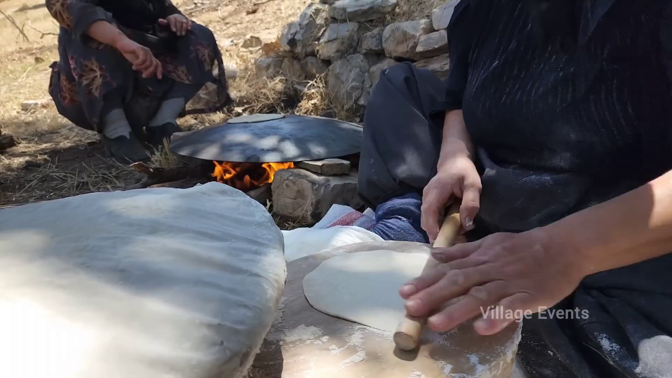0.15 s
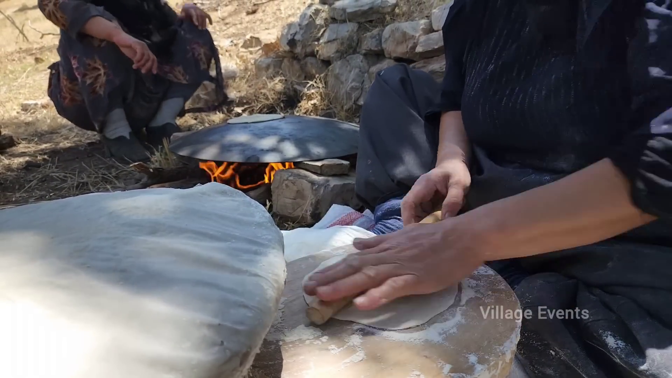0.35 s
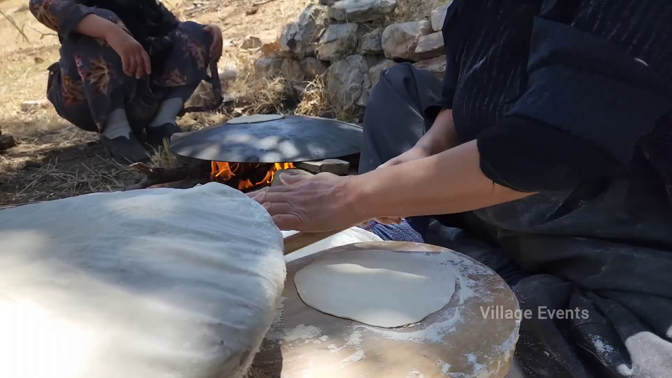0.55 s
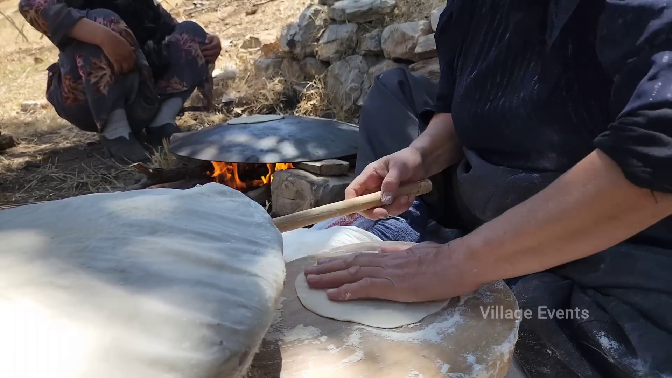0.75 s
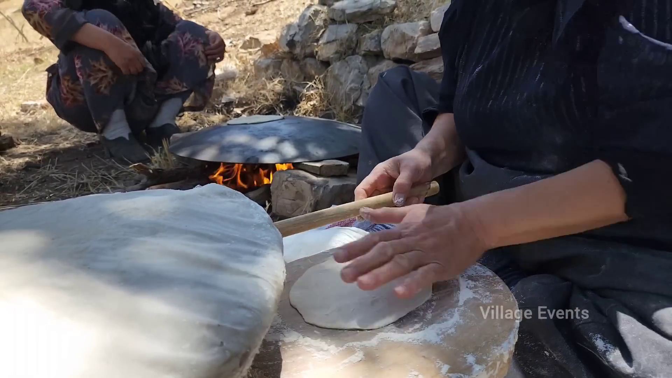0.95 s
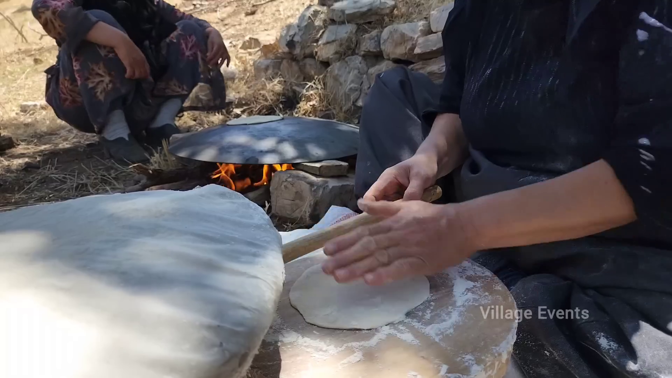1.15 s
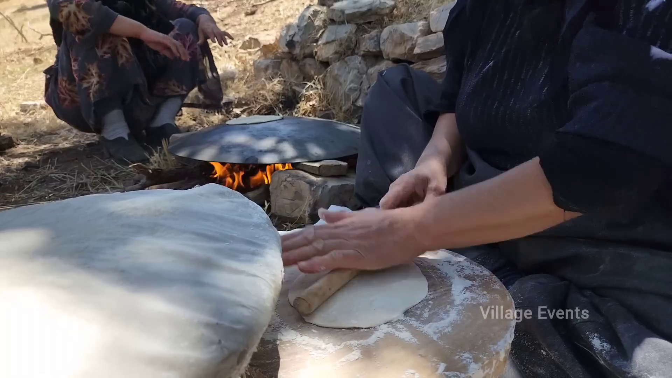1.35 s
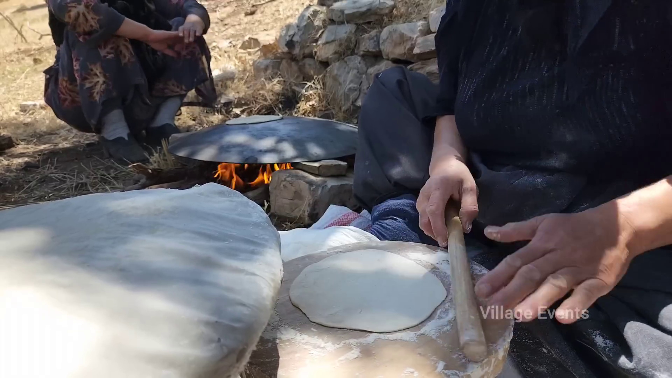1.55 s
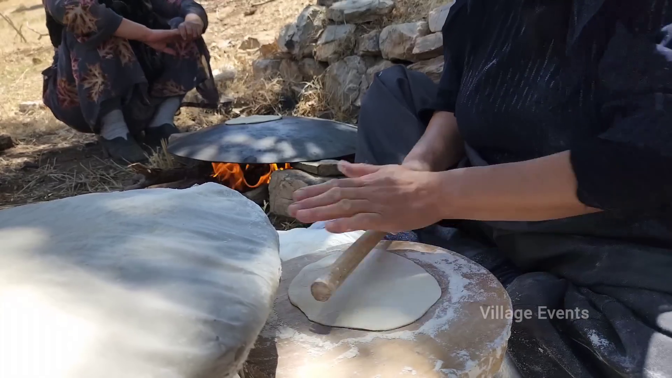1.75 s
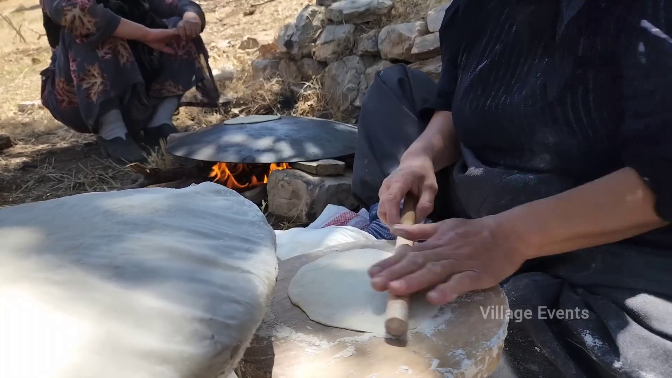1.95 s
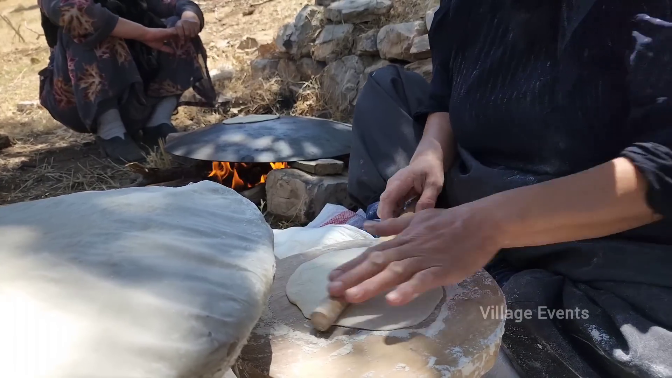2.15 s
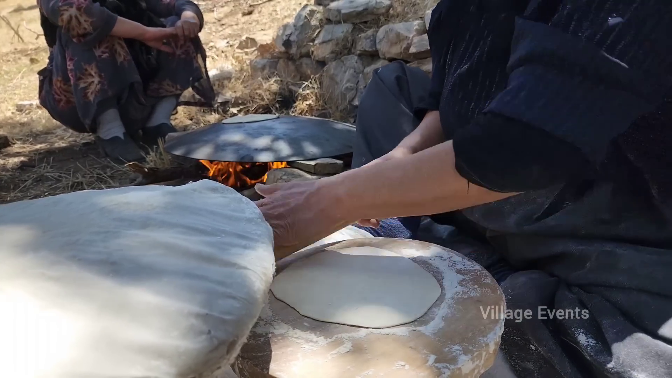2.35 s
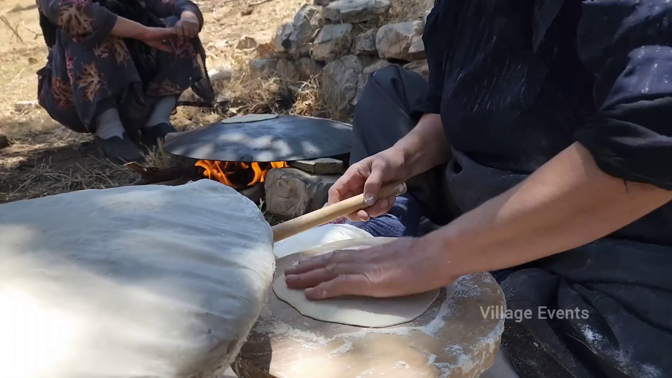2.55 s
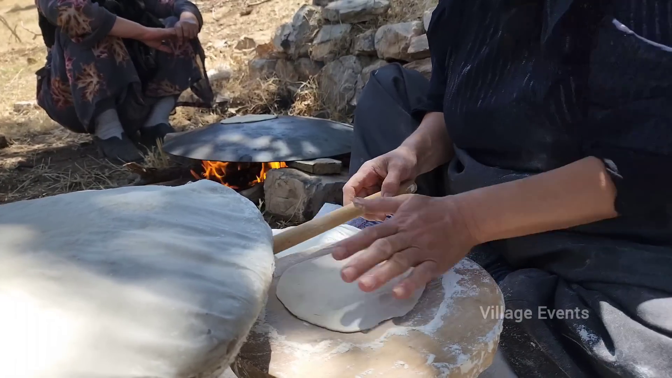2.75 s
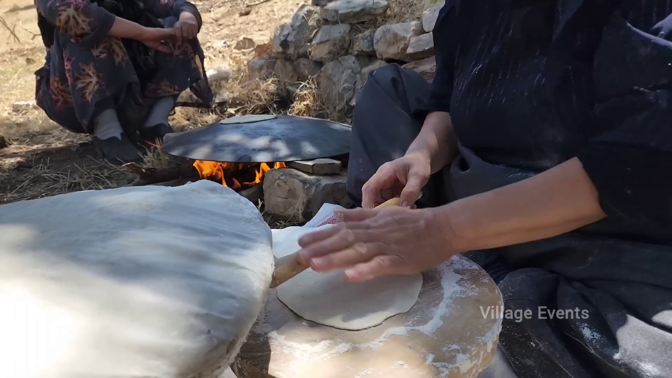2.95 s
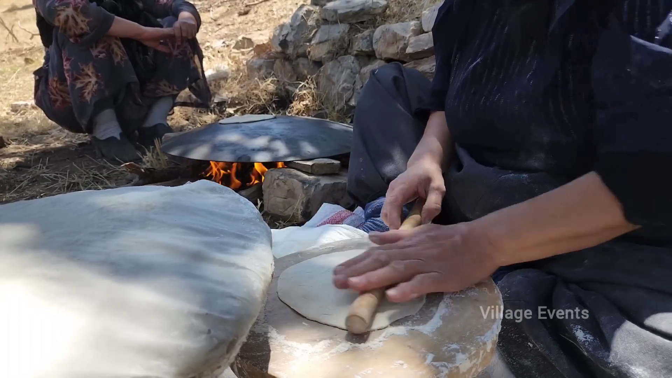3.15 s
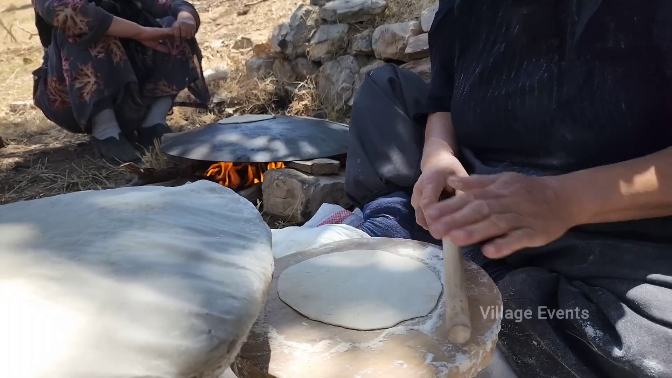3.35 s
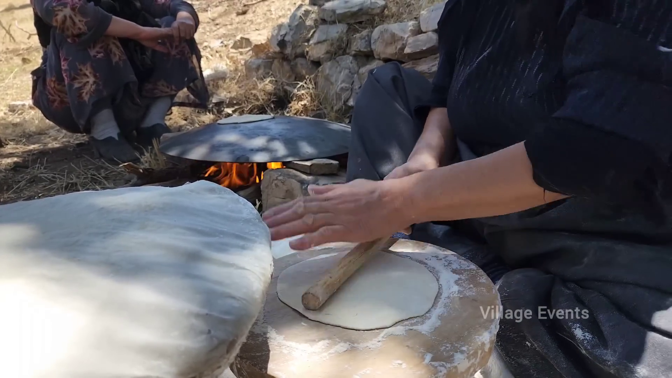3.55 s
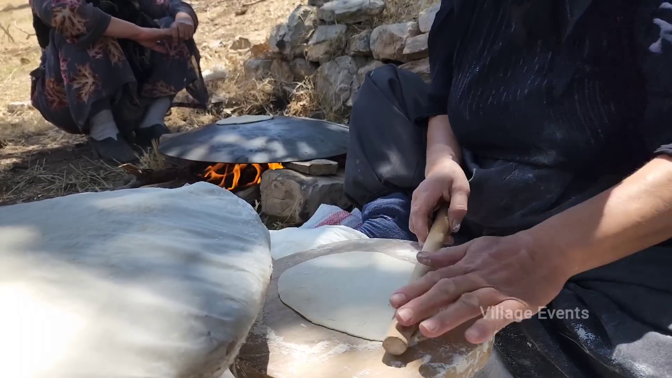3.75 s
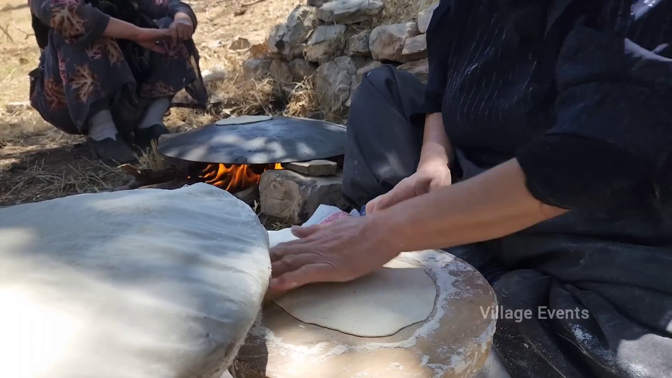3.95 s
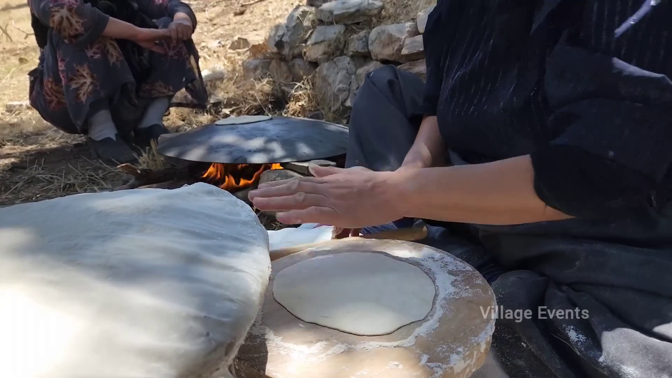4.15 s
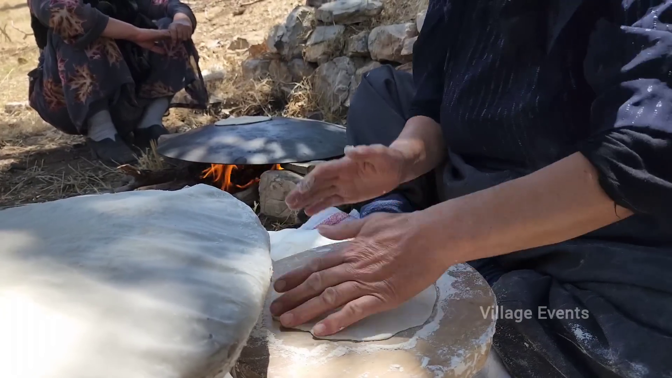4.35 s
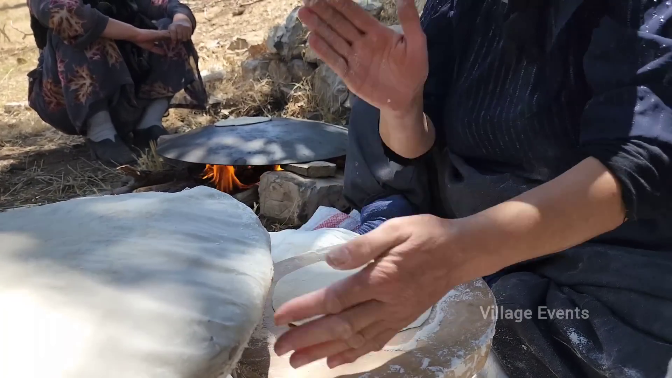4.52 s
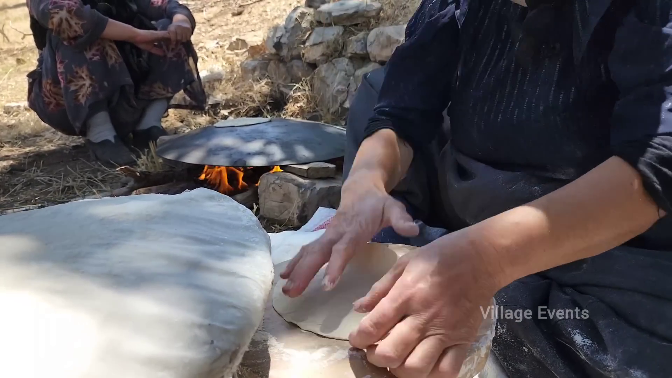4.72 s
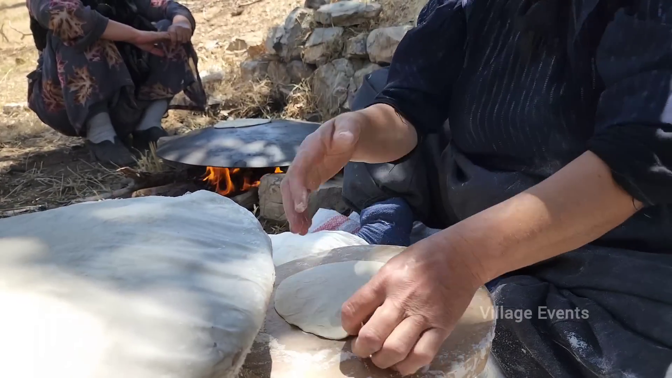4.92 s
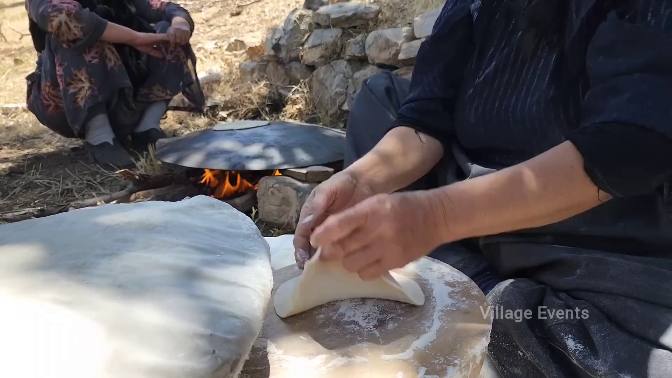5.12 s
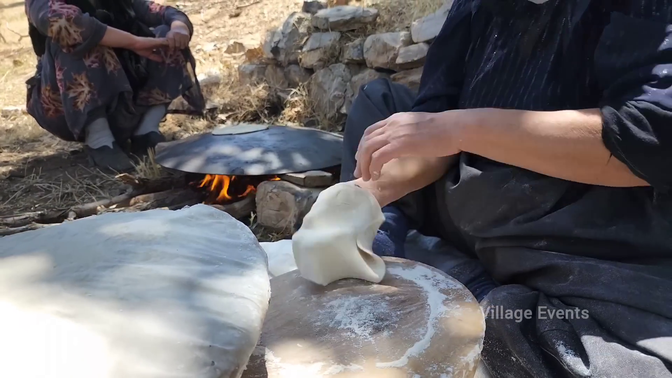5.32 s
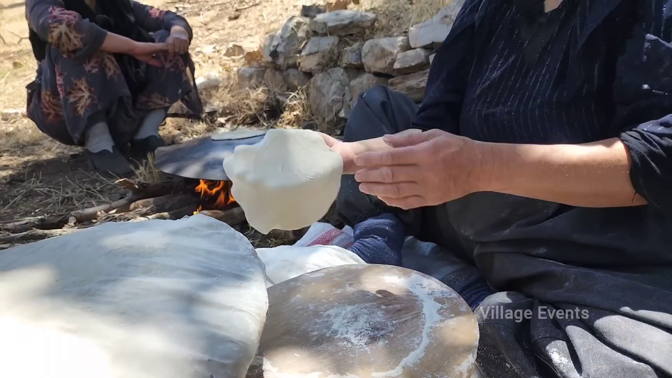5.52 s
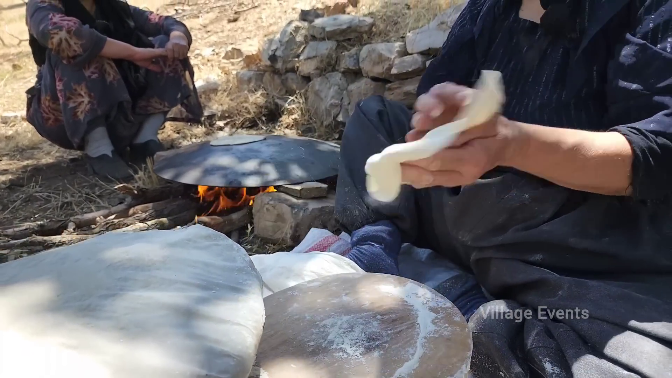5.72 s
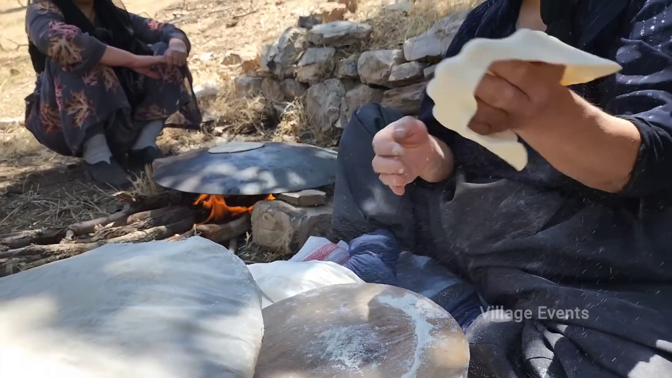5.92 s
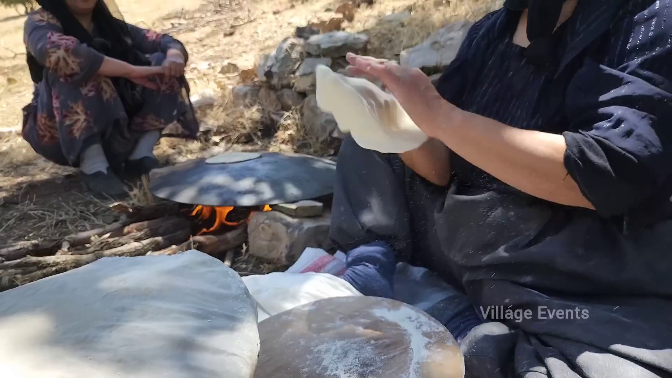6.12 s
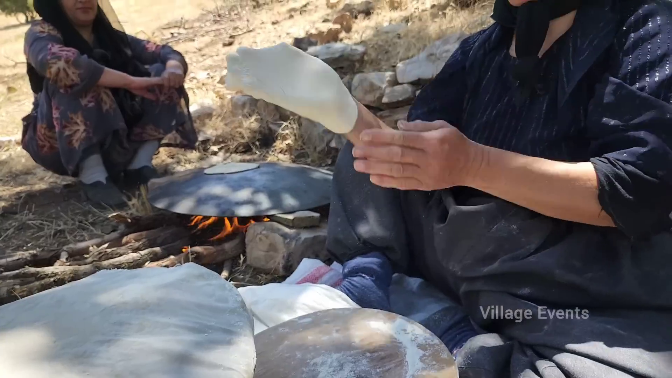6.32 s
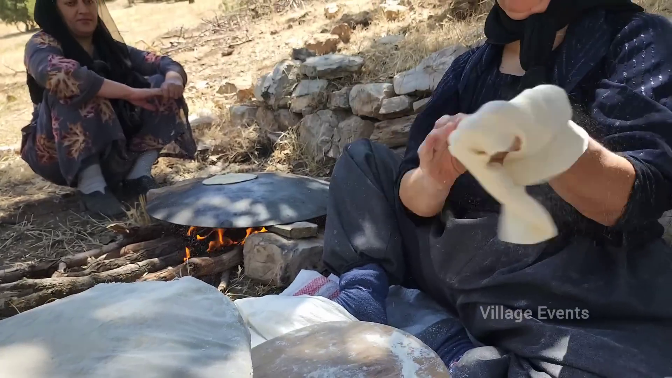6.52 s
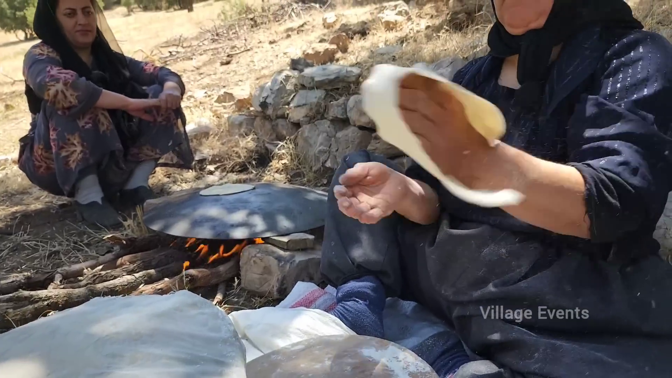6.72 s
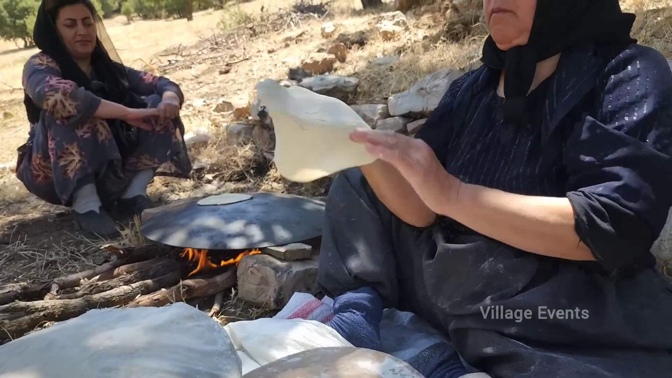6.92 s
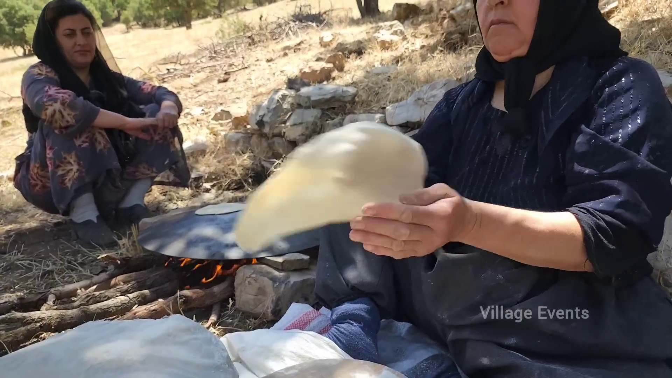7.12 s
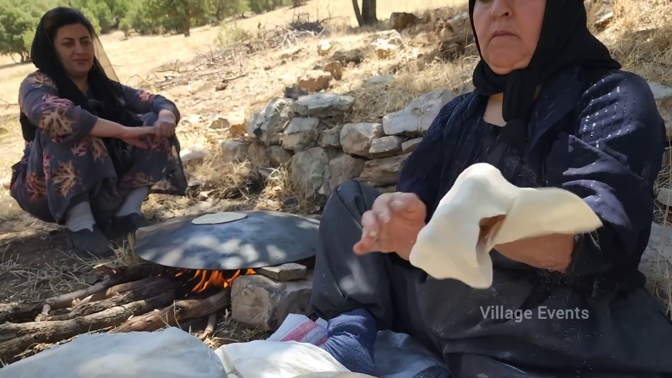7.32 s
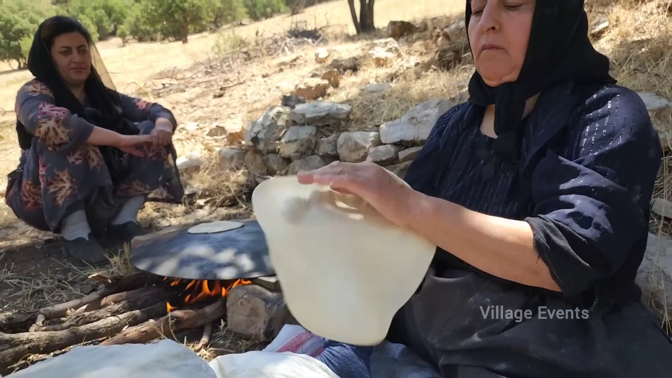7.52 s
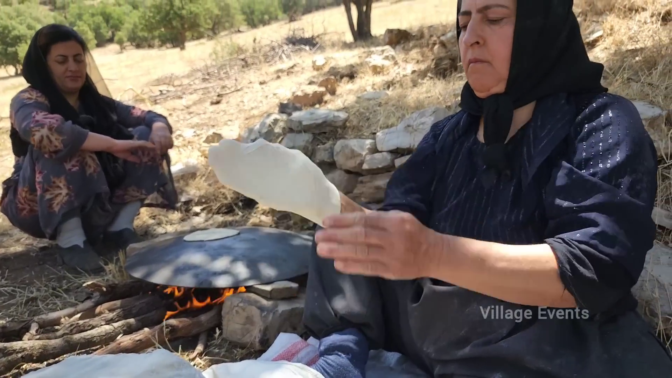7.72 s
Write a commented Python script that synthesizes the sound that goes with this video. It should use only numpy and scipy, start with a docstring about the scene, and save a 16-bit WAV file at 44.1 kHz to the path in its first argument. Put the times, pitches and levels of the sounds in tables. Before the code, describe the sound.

Close to the microphone, a thin wooden rolling pin works dough on a floured board with soft hissing strokes and scattered knocks. The pin is put down with a brief clatter as a bird starts whistling on the left. A palm gives the dough one sharp slap, then the sheet is tossed between hands in light, flapping pats. Faint distant birds and a low rumble of air fill the hillside.

```python
"""On a wooded hillside, air rumbles around a stereo microphone and small birds call far off.
Close by, a thin wooden pin rolls dough on a floured board, hissing, ringing and knocking; a hand
wipes the dough. Just after 4 s a nearer bird starts whistling on the left and the pin is put down.
At 4.7 s a palm slaps the sheet, popping the air trapped under it. From 5.8 s the sheet is tossed
from hand to hand, its rim flapping, while the bird sings on and the slope echoes it."""
import sys
import numpy as np
from scipy import signal
from scipy.fft import rfft, irfft, next_fast_len
from scipy.io import wavfile
from scipy.ndimage import uniform_filter1d

SR = 44100
rng = np.random.default_rng(int(sys.argv[2]) if len(sys.argv) > 2 else 0)


def put_to_file(sound):
    """Save the sound as 16-bit audio at rate SR, in the file named by the first command-line argument."""
    columns = np.atleast_2d(sound).T  # one column per channel
    safe = np.clip(columns, -1, 1)
    whole_steps = np.round(safe * 32767)
    wavfile.write(sys.argv[1], SR, whole_steps.astype(np.int16))


N = 347047
T = np.arange(N) / SR
RING_T = T[:SR // 3]  # time within one blow


def undb(db):
    """Decibels to gain."""
    return 10 ** (np.asarray(db) / 20)

def unit(x):
    """Scale to rms 1."""
    return x / np.sqrt(np.mean(x ** 2))

def colour(x, points):
    """Filter by a spectrum of (frequency [Hz], gain [dB]) points."""
    hz, db = np.transpose(points)
    size = next_fast_len(len(x))
    f = np.maximum(np.fft.rfftfreq(size, 1 / SR), 1)
    gain = undb(np.interp(np.log(f), np.log(hz), db))
    return irfft(rfft(x, size) * gain, size)[:len(x)]

def lowpass(x, hz):
    """Gentle causal low-pass."""
    return signal.sosfilt(signal.butter(2, hz, fs=SR, output="sos"), x)

def highpass(x, hz):
    """Small bodies radiate little deep bass."""
    return signal.sosfilt(signal.butter(2, hz, "high", fs=SR, output="sos"), x)

def walk(rate, size=N):
    """Smooth random drift with a spread near 1."""
    width = max(int(SR / rate), 1)
    drift = uniform_filter1d(rng.standard_normal(size), width, mode="wrap")
    return unit(uniform_filter1d(drift, width, mode="wrap"))

def ring(hz, t60):
    """One decaying mode."""
    return np.sin(2 * np.pi * hz * RING_T) * np.exp(-np.log(1000) * RING_T / t60)

def grit(rate, spread):
    """Dense tiny slips of uneven size."""
    slips = (rng.random(N) < rate / SR) * rng.standard_normal(N)
    return unit(slips * np.exp(spread * rng.standard_normal(N)))

def add(track, s, sound):
    """Mix a sound in at time s."""
    start = max(int(s * SR), 0)
    track[start:start + len(sound)] += sound[:max(N - start, 0)]

def scatter(x, t60, wet_db, build_s, top_hz):
    """Diffuse echoes from stones, ground and trees, different on each side of the microphone."""
    t = T[:SR]
    shape = np.exp(-np.log(1000) * t / t60) * (1 - np.exp(-t / build_s))
    tails = [lowpass(unit(rng.standard_normal(SR) * shape), top_hz) / np.sqrt(SR) for _ in range(2)]
    return undb(wet_db) * np.array([signal.fftconvolve(x, tail)[:N] for tail in tails])


# Open air on the hillside: (frequency [Hz], relative level [dB])
AIR_SPECTRUM = [(20, -12), (40, -2), (80, 1), (110, -9), (225, -22), (565, -28.5), (1300, -30.5),
                (2840, -36), (4200, -31), (6000, -32.5), (8500, -36.5), (11500, -31.5), (13000, -38),
                (15500, -42)]
# Its stereo width: (frequency [Hz], side minus mid [dB])
AIR_WIDTH = [(30, -20.5), (80, -18), (250, -5), (1000, -2), (4000, 2.5), (12000, 2.5)]

def air(mid_db=-53.5, drone_hz=73, drone_db=-60):
    """Hiss and rumble all around, with a faint wavering drone; the bass is alike on both sides."""
    mid, side = (unit(colour(rng.standard_normal(N), AIR_SPECTRUM)) for _ in range(2))
    side = colour(side, AIR_WIDTH)
    swell = undb(drone_db + 1.1 * walk(rate=4.8))
    hz = drone_hz + 3 * walk(rate=7.17)
    drone = swell * np.sin(2 * np.pi * np.cumsum(hz) / SR)
    return undb(mid_db) * np.array([mid + side, mid - side]) + drone


# Bird syllables by name: (time from onset [s], pitch [Hz], relative level [dB])
SYLLABLE_SHAPES = { "slide": [(0, 8000, -10), (.03, 7450, 0), (.07, 7150, -1), (.15, 7000, -10)],
                   "dip": [(0, 5450, -4), (.012, 4750, 0), (.023, 4100, -1), (.036, 3700, -8)],
                   "rise": [(0, 4400, -4), (.015, 4800, 0), (.03, 5700, 0), (.047, 6550, -2)],
                   "scoop": [(0, 7080, -5), (.012, 6900, -1), (.03, 6400, -1), (.045, 7000, 0),
                   (.059, 7800, -5), (.066, 6300, -12), (.078, 5100, -13)], "whistle": [(0, 5850, -4),
                   (.04, 6000, 0), (.08, 6150, 0), (.125, 6000, -7)], "flick": [(0, 5100, -4),
                   (.008, 5900, 0), (.019, 6850, -4), (.027, 5900, -7), (.036, 4700, -12)],
                   "plunge": [(0, 8100, -6), (.012, 6800, 2), (.03, 5300, 2), (.042, 4800, 4),
                   (.06, 4750, -3)], "hook": [(0, 5800, -12), (.012, 7550, -1), (.04, 7200, 1),
                   (.11, 7000, -4)], "arch": [(0, 5600, -10), (.012, 7400, -2), (.045, 7850, 0),
                   (.08, 7650, 0), (.11, 7150, -3)], "fall": [(0, 7700, -9), (.012, 6700, 0),
                   (.05, 6000, 0), (.08, 5000, -5)], "droop": [(0, 6570, -5), (.03, 6250, 0),
                   (.05, 5750, 0), (.072, 4950, -4)], "peep": [(0, 3700, -8), (.025, 3900, 0),
                   (.07, 3870, -3)]}

def whistles(calls, waver, flutter_db=2.0):
    """A bird's pure gliding tones, each a slightly unsteady copy of its syllable."""
    out = np.zeros(N)
    for s, name, db, pitch in calls:
        at, hz, shape_db = np.transpose(SYLLABLE_SHAPES[name])
        t = T[:int(at[-1] * SR)]
        glide = uniform_filter1d(np.interp(t, at, hz), size=260) * pitch
        glide *= 1 + waver * walk(rate=240, size=len(t))
        swell = undb(db + np.interp(t, at, shape_db) + flutter_db * walk(rate=13, size=len(t)))
        swell *= signal.windows.tukey(len(t), .15)
        add(out, s, swell * np.sin(2 * np.pi * np.cumsum(glide) / SR))
    return out


# Spells of twitter in the trees:
# (start [s], end [s], rate [1/s], relative level [dB], lowest pitch [factor], highest pitch [factor])
TWITTER_SPELLS = [(.3, 4.0, 3, -88, 1, 1.6), (4.899, 7.8, 20, -65.5, .45, .85)]

def twitter():
    """List faint syllables at loose intervals and random pitches."""
    calls = []
    for start, end, rate, db, low, high in TWITTER_SPELLS:
        for s, (late, kind, loud, pitch) in zip(np.arange(start, end, 1 / rate), rng.random((64, 4))):
            name = "flick" if kind < .5 else "dip"
            calls.append((s + late / rate, name, db + 8 * (loud - .5), low + (high - low) * pitch))
    return calls


# Single calls far from the microphone: (time [s], syllable, relative level [dB], pitch [factor])
DISTANT_CALLS = [(0, "scoop", -51, 1.12), (1.17, "slide", -63.5, 1.1), (1.86, "slide", -63.5, 1),
                 (2.56, "arch", -65.5, 1.03), (3.5, "slide", -70.5, 1), (3.96, "peep", -60.5, 1.13),
                 (5.26, "peep", -63, 1.0), (5.575, "peep", -51.5, 0.97), (6.35, "droop", -58.5, .57),
                 (7.04, "rise", -63, .54), (7.25, "droop", -58, .41), (7.715, "droop", -55.5, .68),
                 (7.79, "scoop", -49, 1.11)]

def far_birds():
    """Birds deep among the trees: little but echo reaches the microphone."""
    calls = whistles(DISTANT_CALLS + twitter(), waver=.02)
    return undb(-8) * calls + scatter(calls, t60=0.44, wet_db=9.5, build_s=0.0015, top_hz=14000)


# Close sounds reach the microphone's two ports out of step: (frequency [Hz], left lead [rad])
PORT_PHASE = [(0, 0), (300, .3), (1000, .75), (2500, 1.5), (4500, 1.8), (8000, 1.2), (16000, 1.2)]

def off_axis(x, left_db):
    """Close sound bends around the recorder to reach the right port later; left_db tips the balance."""
    hz, lead = np.transpose(PORT_PHASE)
    size = next_fast_len(N)
    lag = np.interp(np.fft.rfftfreq(size, 1 / SR), hz, lead)
    right = irfft(rfft(x, size) * np.exp(-1j * lag), size)[:N]
    return np.array([x * undb(left_db / 2), right * undb(-left_db / 2)])

def wipes(starts, lengths, levels_db, peak_share=.35):
    """Gain of sweeps of the hand: each swells and dies with its speed."""
    gain = np.zeros(N)
    for s, length, db in zip(starts, lengths, levels_db):
        along = np.interp(T[:int(length * SR)] / length, [0, peak_share, 1], [0, .5, 1])
        add(gain, s, undb(db) * np.sin(np.pi * along) ** 2)
    return gain

def strokes(starts, lengths, levels_db, openings_db, fade_db_per_s):
    """Gain of strokes at the pin: a quick attack, a brief opening at its own level, a fade, a release."""
    attack_s, opening_s, release_s = 0.0096, 0.043, 0.013
    gain, t = np.zeros(N), T[:SR // 2]
    attack = np.minimum(t / attack_s, 1)
    for s, length, db, opening_db in zip(starts, lengths, levels_db, openings_db):
        level = undb(db + opening_db * np.exp(-(t / opening_s) ** 4) - fade_db_per_s * t)
        release = np.exp(-np.maximum(t - length, 0) / release_s)
        add(gain, s, level * attack * release)
    return gain


# Bending modes of the pin: (frequency [Hz], struck gain [dB], t60 [s], rubbed gain [dB])
PIN_MODES = [(812, -16.5, .12, -30), (1490, -15.5, .05, -14), (1945, -14, .13, -2), (2090, -5, .075, 11),
             (2800, -17, .03, 7), (3530, -5, .085, 7), (3760, -1, .06, 10), (5300, -8, .07, 4),
             (5720, -3.5, .07, 4.5), (7350, -17, .05, -4)]
# Flour hiss, bright at this close range: (frequency [Hz], relative level [dB])
FLOUR_SPECTRUM = [(1000, -22), (3000, -8), (6000, -4), (8500, -4), (11500, 0), (13000, -1), (15800, 0)]
# The pin scuffing dough: (frequency [Hz], relative level [dB])
SCUFF_SPECTRUM = [(150, -51), (800, -42.5), (1400, 9.5), (2000, -2), (3000, 14), (15000, 2)]
# Strokes at the pin: rolling pushes, and two short hisses near 1.1 s as the hand slides along it:
# (time [s], length [s], ring gain [dB], hiss gain [dB], opening gain [dB])
PIN_STROKES = [(0.048, .19, -57, -56.5, 7), (0.395, 0.18, -50.5, -54, 2), (0.52, 0.041, -50.5, -62, 0),
               (1.091, 0.019, -55, -39.5, 0.5), (1.121, 0.037, -59, -42, -0.5),
               (1.403, 0.18, -53, -51, 6.5), (1.925, 0.18, -57.5, -54.5, 12), (2.209, 0.15, -71.5, -70, 18),
               (2.303, 0.074, -47, -52, -7), (2.892, .052, -66, -51, -3.5), (3.06, 0.0077, -74, -52, 3),
               (3.147, 0.21, -61, -55.5, 2.5), (3.65, 0.17, -60.5, -56, 11),
               (3.956, 0.099, -57.5, -67.5, 9)]

def rolling_pin(ring_boost_db=3.0, scuff_db=-58, held_t60_share=.3, grip_detune=.012):
    """Close up, floury slips hiss and ring the pin, which each grip detunes; mid-stroke it scuffs."""
    starts, lengths, rings_db, hisses_db, openings_db = zip(*PIN_STROKES)
    spurts = undb(4 * walk(rate=90))
    slips = grit(rate=3000, spread=0.15) * spurts
    wood = np.zeros(N)
    for start, end in zip(starts, starts[1:] + (starts[-1] + .5,)):
        body = np.zeros(len(RING_T))
        for hz, _, t60, db in PIN_MODES:
            gain = undb(db + rng.standard_normal())
            body += gain * ring(hz * (1 + grip_detune * rng.standard_normal()), t60 * held_t60_share)
        drive = slips[int(start * SR):int(end * SR)]
        add(wood, start, unit(signal.fftconvolve(drive, body)[:len(drive)]))
    pin = undb(ring_boost_db) * highpass(wood, hz=1400)
    pin *= strokes(starts, lengths, rings_db, openings_db, fade_db_per_s=24)  # the hand damps the wood
    flour = unit(colour(grit(rate=11000, spread=0.12), FLOUR_SPECTRUM)) * undb(2.3 * walk(rate=19))
    flour *= strokes(starts, lengths, hisses_db, openings_db, fade_db_per_s=18)
    scuff = unit(colour(slips, SCUFF_SPECTRUM)) * wipes(starts, lengths, [scuff_db] * len(starts))
    return off_axis(pin, left_db=-3.5) + flour + scuff


# Modes of the board: (frequency [Hz], relative level [dB], t60 [s])
BOARD_MODES = [(115, -38, .09), (157, -8.5, 0.08), (186, -11.5, 0.059), (285, -7.5, 0.035),
               (348, -10, 0.039), (460, -0.5, 0.02), (547, -10, 0.096), (750, -10, 0.027),
               (944, -15.5, 0.051), (1410, -21.5, 0.024), (1570, -6.5, 0.017), (2810, -8, 0.021)]

def board(thud_db):
    """The struck board rings; weight behind a blow brings out its low modes."""
    return sum(undb(db + thud_db * (hz < 650)) * ring(hz, t60) for hz, db, t60 in BOARD_MODES)


# Knocks near the microphone, the last as the pin is put down:
# (time [s], relative level [dB], contact cut-off [Hz], thud gain [dB], pin gain [dB], pin t60 [factor])
PIN_KNOCKS = [(0.4, -49, 4960, -0.5, -12, 0.84), (.529, -38, 6000, -9, 0.5, 1.2),
              (1.101, -44.5, 6000, -6.5, -18, .25), (2.217, -42.5, 2500, 3, -8, 0.31),
              (2.362, -43, 6040, -4.5, 10.5, 0.59), (2.376, -36, 4000, -14, -11, 1.2),
              (3.3487, -20.5, 2300, -46, -11.5, 0.62), (3.945, -49, 11000, 5, 4.5, 0.4),
              (3.97, -31, 2520, -11.5, -21, .7), (4.063, -24, 1100, -41, -5, 3.2),
              (4.0848, -23, 16200, -41, -0.5, 0.66), (4.121, -34.5, 6830, -8, -8.5, 2.5),
              (4.278, -40.5, 2500, 0, -5, .5), (4.3195, -12.5, 1770, 2, 3, 0.87),
              (4.3226, -31, 2040, -18, 15.5, 0.27), (4.331, -15.5, 2500, -22, -13, 0.2)]

def knocks(wood_db=-3, crack_db=-11, crack_s=0.0105, tick_db=-25):
    """The pin meets the board: a soft contact is dull, a tight grip shortens the ring."""
    out = np.zeros(N)
    for s, db, contact_hz, thud_db, pin_db, t60_factor in PIN_KNOCKS:
        pin = sum((-1) ** k * undb(mode_db + pin_db + rng.standard_normal()) * ring(hz, t60 * t60_factor)
                  for k, (hz, mode_db, t60, _) in enumerate(PIN_MODES))
        crack = rng.standard_normal(len(RING_T)) * np.exp(-RING_T / crack_s)
        blow = lowpass(undb(wood_db) * (pin + board(thud_db)) + undb(crack_db) * crack, contact_hz)
        tick = undb(tick_db) * highpass(crack, hz=6720)  # crushed flour stays bright
        add(out, s, undb(db) * (blow + tick))
    return highpass(out, hz=85.2)


# Skin sliding on dough: (frequency [Hz], relative level [dB])
SKIN_SPECTRUM = [(180, -57), (300, -9), (365, -11), (416, -74), (507, -63), (680, -49), (738, -25.5),
                 (1350, -5.5), (2650, -4.5), (3120, -10), (15000, -16)]
# Wipes of the palm, close and centred: (time [s], length [s], skin gain [dB], hiss gain [dB])
PALM_WIPES = [(.775, 0.26, -67, -66), (2.59, .27, -67.5, -54), (4.48, 0.091, -69, -56),
              (5.756, 0.06, -70.5, -54), (6.484, 0.061, -64.5, -52)]

def rubbing(skin_gain_db=17.0, hiss_gain_db=-5):
    """The palm wipes over the dough: skin rasps in tiny slips and flour hisses."""
    starts, lengths, skins_db, hisses_db = zip(*PALM_WIPES)
    skin = unit(colour(grit(rate=16000, spread=0.36), SKIN_SPECTRUM))
    flour = unit(colour(grit(rate=4400, spread=0.23), FLOUR_SPECTRUM))
    return (undb(skin_gain_db) * skin * wipes(starts, lengths, skins_db)
            + undb(hiss_gain_db) * flour * wipes(starts, lengths, hisses_db))


# Song of the nearer bird, left of the microphone:
# (time [s], syllable, repeats, period [s], relative level [dB], pitch [factor], echo send [dB])
NEAR_SONG = [(4.09, "slide", 1, 0, -46.5, 1.01, -5.5), (4.335, "dip", 2, .21, -46, 1.07, -2),
             (4.426, "rise", 2, .212, -46, 1.05, 2), (4.765, "scoop", 6, .132, -42, 0.98, -3),
             (5.688, "whistle", 1, 0, -38.5, 1.007, -6.5), (5.811, "flick", 7, .0776, -44, 0.99, -2),
             (6.453, "plunge", 1, 0, -45, 1.01, -1.5), (6.572, "dip", 4, .25, -45.5, 1.02, -4),
             (6.662, "hook", 1, 0, -40.5, 0.99, -4.5), (6.91, "arch", 2, .25, -40.5, 0.98, -10),
             (7.524, "fall", 1, 0, -41.5, 1, 1), (7.701, "droop", 1, 0, -39, 0.99, -1)]

def near_bird(detune=.004, left_db=6, right_lag_s=23e-6):
    """The bird whistles its syllables in evenly paced runs, and the hillside echoes them."""
    voice, outward = np.zeros(N), np.zeros(N)
    for s, name, repeats, period, db, pitch, echo_db in NEAR_SONG:
        calls = [(s + k * period, name, db, pitch * (1 + detune * rng.standard_normal()))
                 for k in range(repeats)]
        phrase = whistles(calls, waver=0.0063)
        voice += phrase
        outward += undb(echo_db) * phrase
    delayed = np.interp(T - right_lag_s, T, voice)
    direct = np.array([voice * undb(left_db / 2), delayed * undb(-left_db / 2)])
    hillside = scatter(outward, t60=0.72, wet_db=8.5, build_s=0.0067, top_hz=14100)
    return direct + hillside * undb([[1.5], [-1.5]])  # the echo leans left too


# The noisy splash of skin striking dough: (frequency [Hz], relative level [dB])
SPLASH_SPECTRUM = [(150, -6), (400, -4.5), (1300, -7), (2800, -8.5), (4500, -11), (8000, -22.5),
                   (15000, -27)]

def slap(pop_db, pop_hz, pop_s, splash_db, splash_s, flesh_db, rise_s):
    """As the contact spreads, trapped air pops out and skin splashes on dough; the flesh thuds."""
    splash = unit(colour(rng.standard_normal(len(RING_T)), SPLASH_SPECTRUM)) * np.exp(-RING_T / splash_s)
    pop = ring(pop_hz, t60=pop_s * np.log(1000))
    contact = 1 - np.exp(-RING_T / rise_s)
    flesh = ring(hz=240, t60=.012)
    return (undb(pop_db) * pop + undb(splash_db) * splash) * contact + undb(flesh_db) * flesh

def palm_slap(lands_s=4.7203, sink_s=0.0019, thump_hz=162, thump_s=0.014):
    """Close to the microphone, fingertips land, then the palm, which sinks in and thuds the board."""
    out = np.zeros(N)
    add(out, lands_s - .002, slap(pop_db=-27.5, pop_hz=1580, pop_s=0.001, splash_db=-27,
                                  splash_s=.002, flesh_db=-40.5, rise_s=0.0017))
    add(out, lands_s, slap(pop_db=3.5, pop_hz=2990, pop_s=.001, splash_db=-3,
                           splash_s=0.0024, flesh_db=-21.5, rise_s=0.000067))
    # the board heaves under the palm, which then stills it
    thump = undb(-11.5) * np.sin(2 * np.pi * thump_hz * RING_T) * np.exp(-(RING_T / thump_s) ** 4)
    thud = undb(-25) * lowpass(board(thud_db=0), hz=400)  # cushioned by the dough
    squash = slap(pop_db=-26, pop_hz=3520, pop_s=0.0057, splash_db=-35.5,
                  splash_s=.012, flesh_db=-41, rise_s=0.0014)
    add(out, lands_s + sink_s, thump + thud + squash)
    return highpass(out, hz=70.6)


# Catches of the sheet, close by: (time [s], pop gain [dB], pop pitch [Hz], pop decay [s],
# splash gain [dB], edge lead [s], edge gain [dB])
SHEET_CATCHES = [(5.779, -31.5, 1484, 0.0043, -40, 0.014, -62),
                 (6.1622, -4.5, 1880, 0.0003, -30, 0.0094, -31.5),
                 (6.526, -24.5, 1490, 0.0013, -41, .02, -33.5),
                 (6.868, -19, 1080, 0.0033, -24.5, .009, -30),
                 (7.236, -27, 1480, 0.0019, -35.5, .026, -33.5),
                 (7.5957, -8.5, 1220, 0.00074, -30, .02, -24)]

def tossing(flaps=3, flap_gap_s=0.016, first_flap_db=-36.5, flap_fall_db=2):
    """The sheet drops from hand to hand: an edge lands, then the middle, then the loose rim flaps."""
    out = np.zeros(N)
    for s, pop_db, pop_hz, pop_s, splash_db, lead_s, edge_db in SHEET_CATCHES:
        edge = slap(edge_db, pop_hz=1812, pop_s=0.0031, splash_db=edge_db - 7,
                    splash_s=0.012, flesh_db=edge_db - 3.5, rise_s=0.0005)
        middle = slap(pop_db, pop_hz, pop_s, splash_db, splash_s=0.0047, flesh_db=-41, rise_s=.17 * pop_s)
        add(out, s - lead_s, edge)
        add(out, s, middle)
        for k, (late, detune) in enumerate(rng.uniform(-.3, .3, (flaps, 2))):
            db = first_flap_db - flap_fall_db * k
            rim = slap(db - 3.5, pop_hz=1150 * (1 + detune), pop_s=0.0017, splash_db=db - 1,
                       splash_s=0.0038, flesh_db=db - 18, rise_s=0.0021)
            add(out, s + flap_gap_s * (k + 1 + late), rim)
    return highpass(out, hz=70.6)


def scene():
    """Handwork close to the microphone and nearly dry; birds and open air around it."""
    blows = off_axis(knocks() + palm_slap() + tossing(), left_db=3.3)
    work = rolling_pin() + rubbing() + blows
    near_echo = scatter(work.mean(axis=0), t60=0.091, wet_db=-14.0, build_s=0.0026, top_hz=8100)
    far_echo = scatter(work.mean(axis=0), t60=0.32, wet_db=-30.5, build_s=0.033, top_hz=5020)
    return work + near_echo + far_echo + near_bird() + far_birds() + air()


# Colour of the microphone's two ports: (frequency [Hz], left minus right [dB])
PORT_BALANCE = [(100, 0.5), (700, 3), (1300, 3.5), (2400, 4.5), (4400, -2.5), (8000, 1.5), (15000, -5.5)]

def record(dry, top_hz=15900):
    """Two unlike ports hear the scene; the recorder clips at full scale and cuts the top."""
    heard = np.array([colour(x, [(hz, side * db / 2) for hz, db in PORT_BALANCE])
                      for x, side in zip(dry, (1, -1))])
    top_cut = signal.ellip(10, .2, 80, top_hz, fs=SR, output="sos")
    return signal.sosfilt(top_cut, np.clip(heard, -1, 1))


dry = scene()
out = record(dry)
put_to_file(out)
```